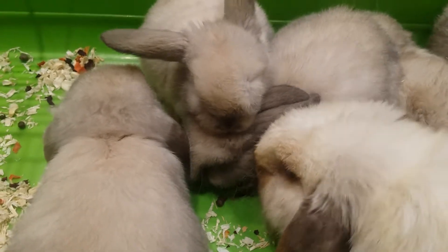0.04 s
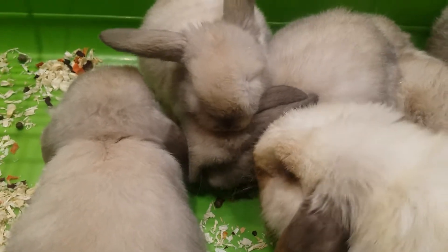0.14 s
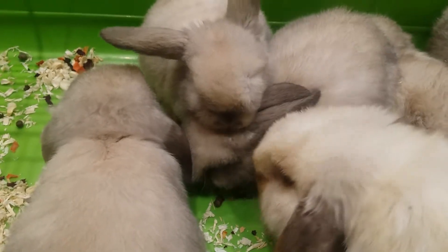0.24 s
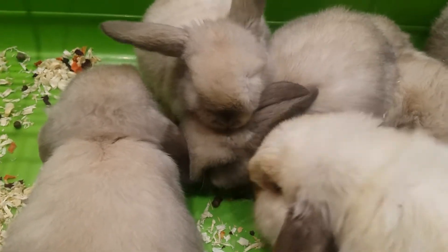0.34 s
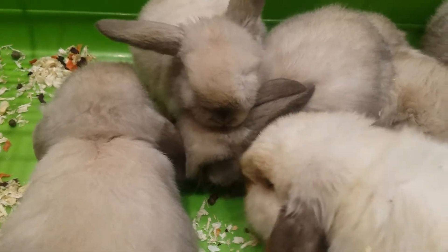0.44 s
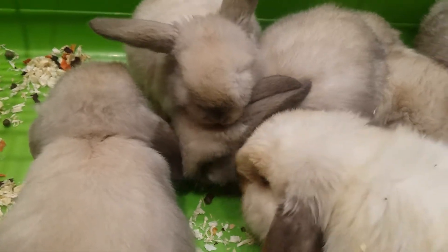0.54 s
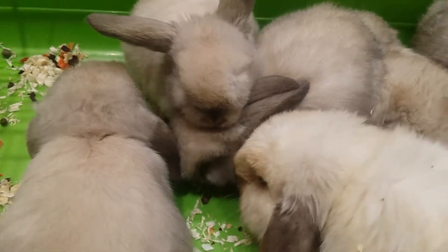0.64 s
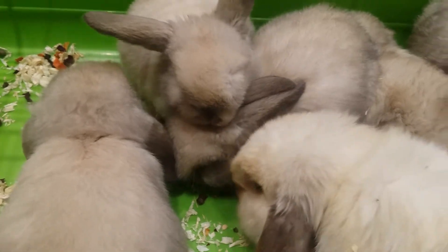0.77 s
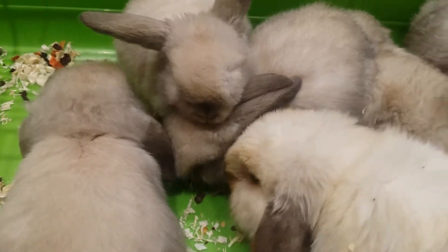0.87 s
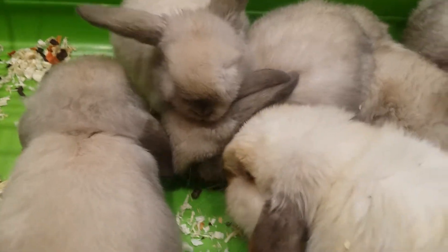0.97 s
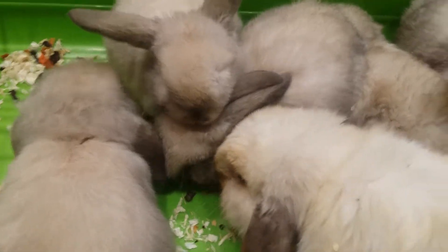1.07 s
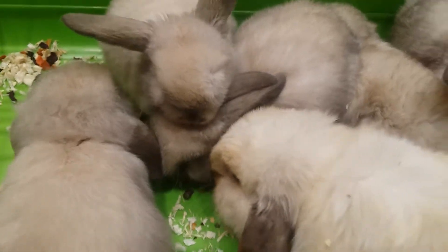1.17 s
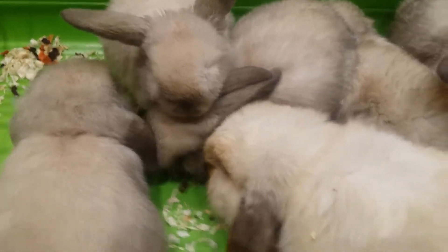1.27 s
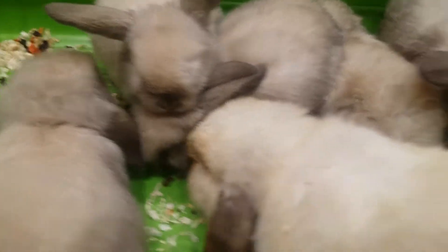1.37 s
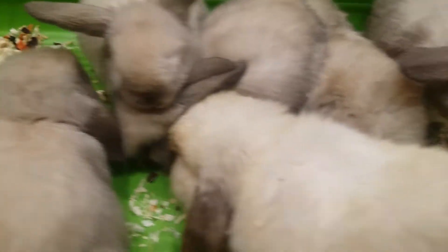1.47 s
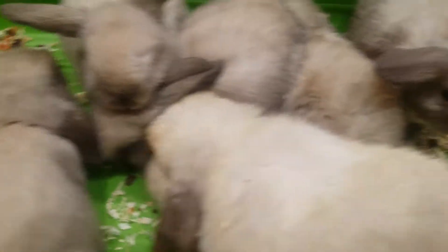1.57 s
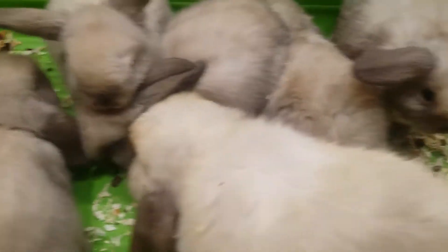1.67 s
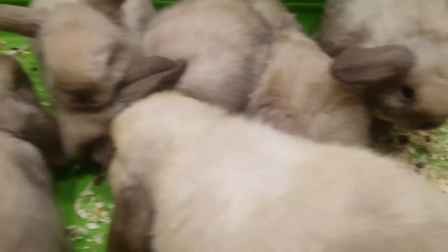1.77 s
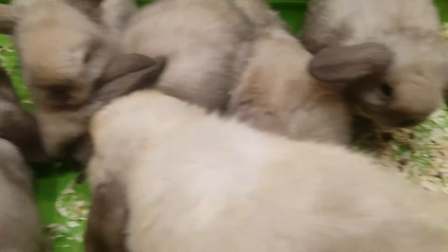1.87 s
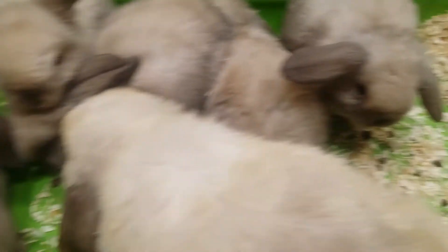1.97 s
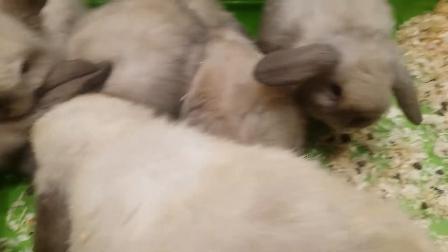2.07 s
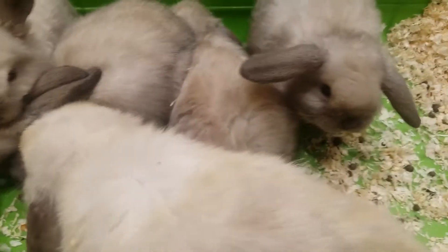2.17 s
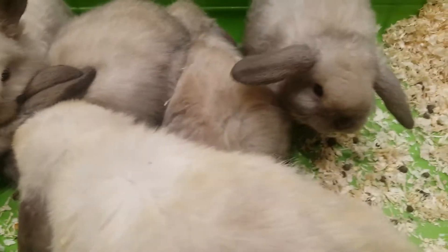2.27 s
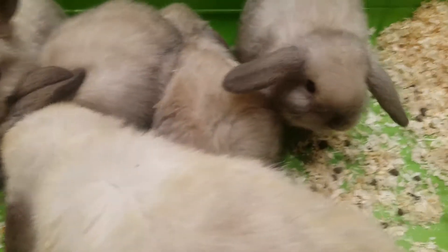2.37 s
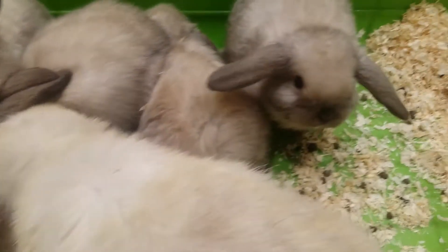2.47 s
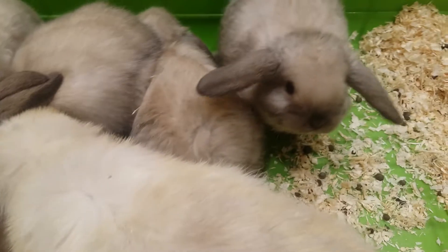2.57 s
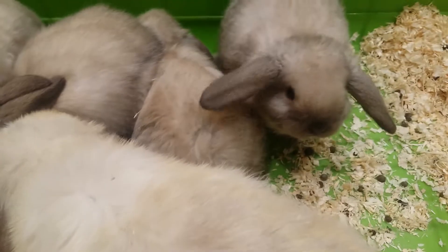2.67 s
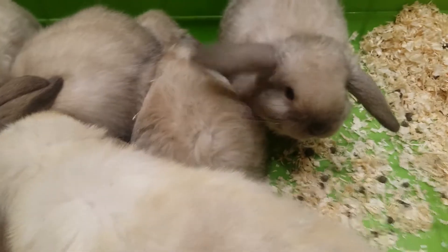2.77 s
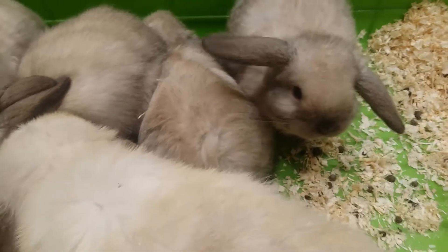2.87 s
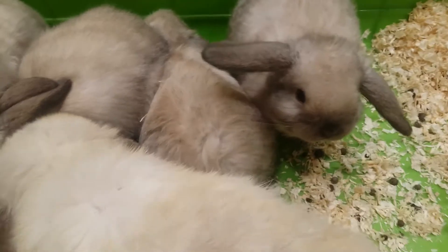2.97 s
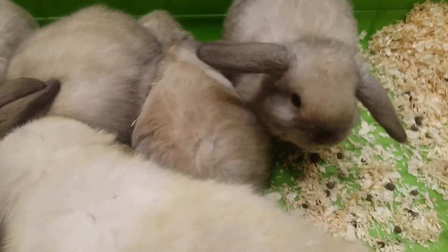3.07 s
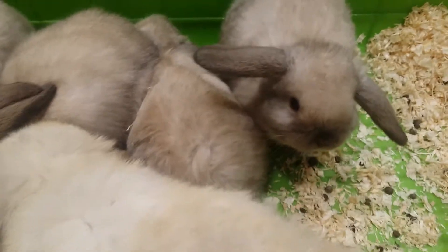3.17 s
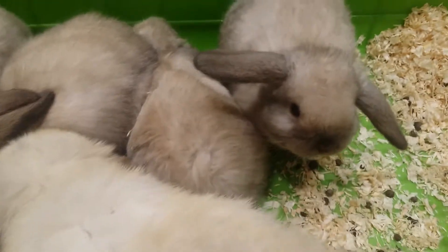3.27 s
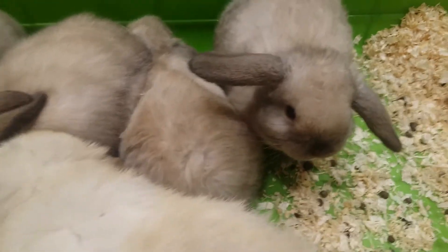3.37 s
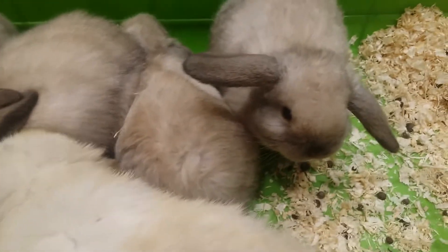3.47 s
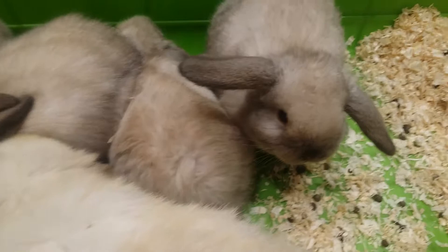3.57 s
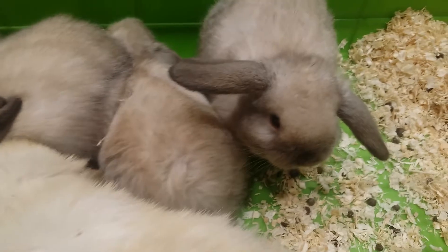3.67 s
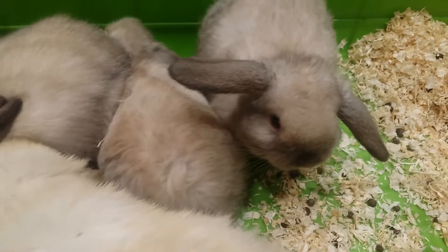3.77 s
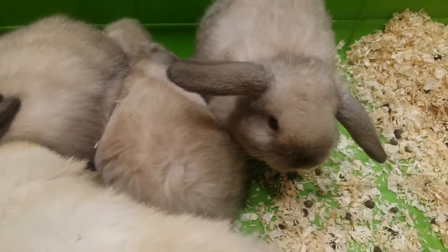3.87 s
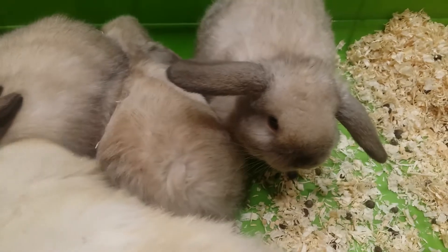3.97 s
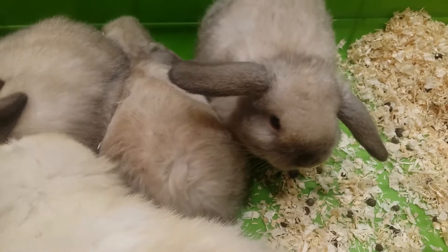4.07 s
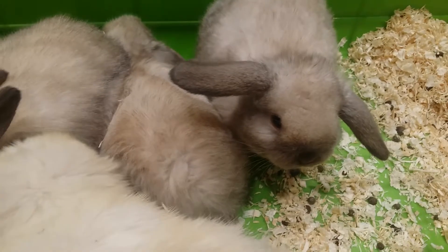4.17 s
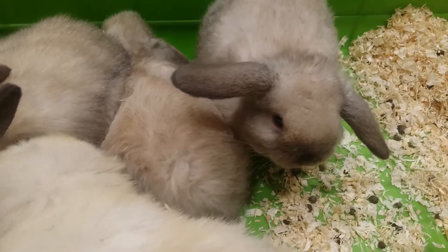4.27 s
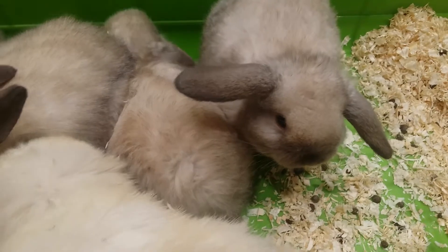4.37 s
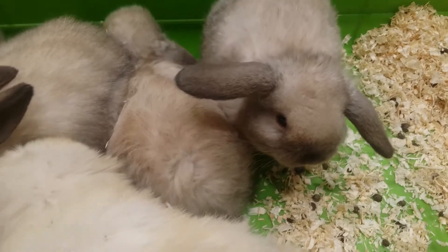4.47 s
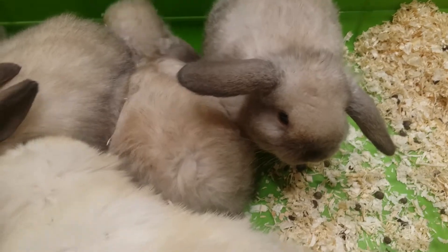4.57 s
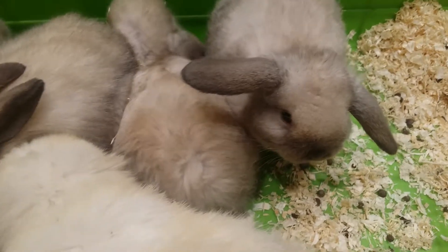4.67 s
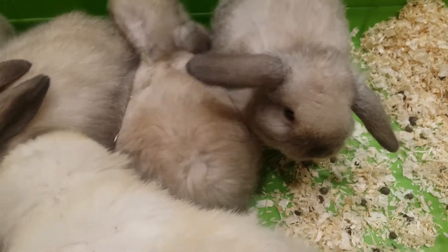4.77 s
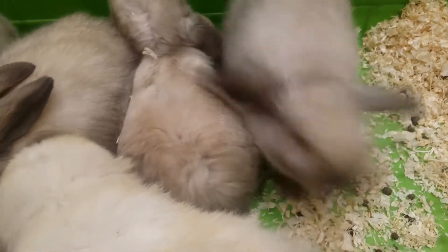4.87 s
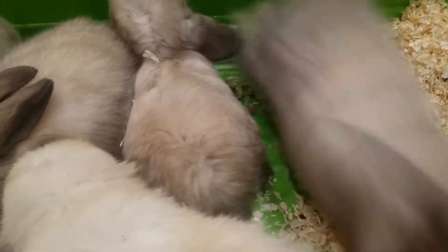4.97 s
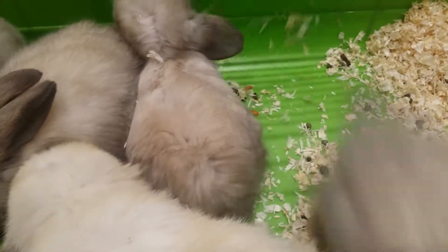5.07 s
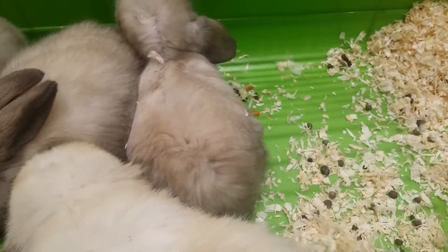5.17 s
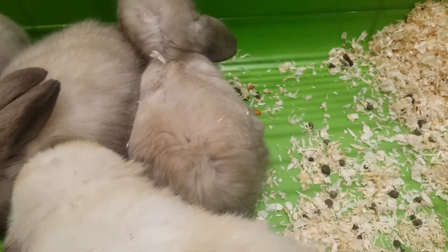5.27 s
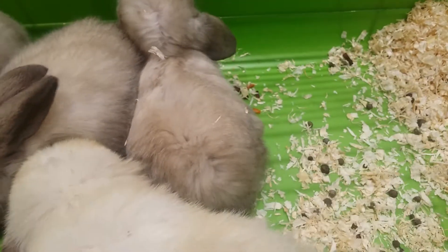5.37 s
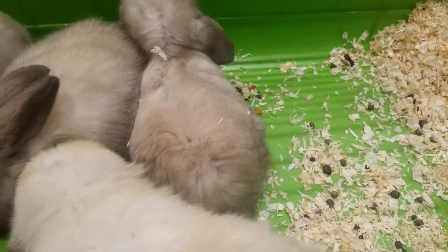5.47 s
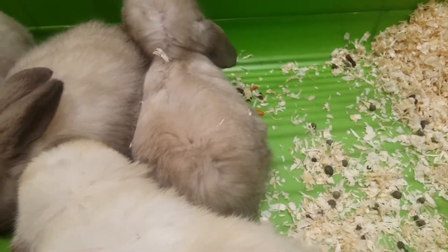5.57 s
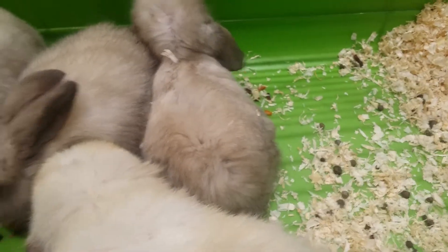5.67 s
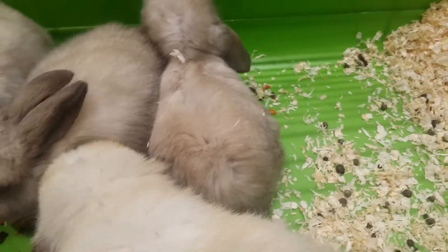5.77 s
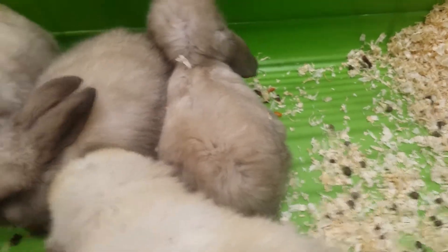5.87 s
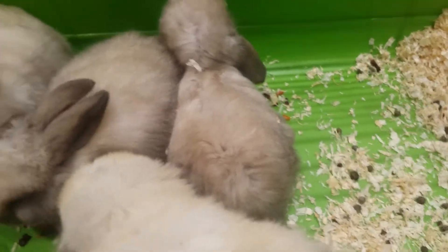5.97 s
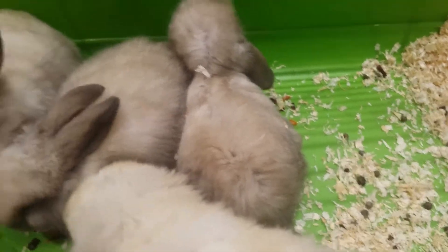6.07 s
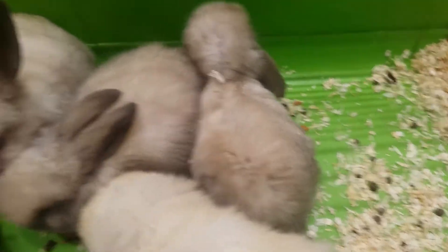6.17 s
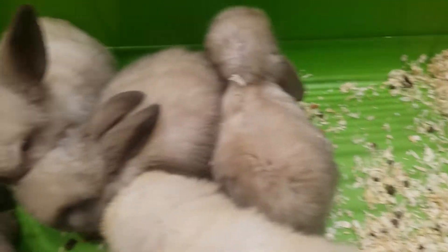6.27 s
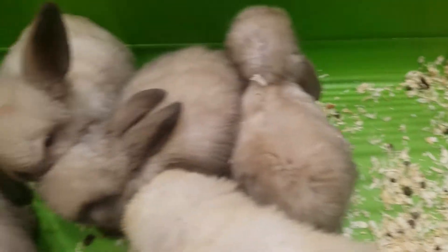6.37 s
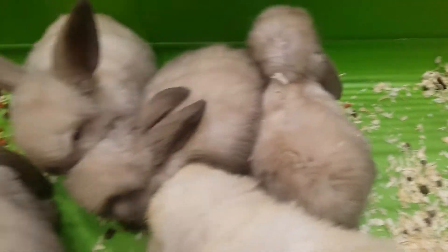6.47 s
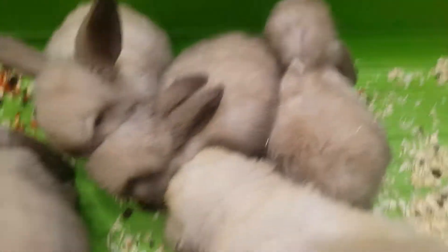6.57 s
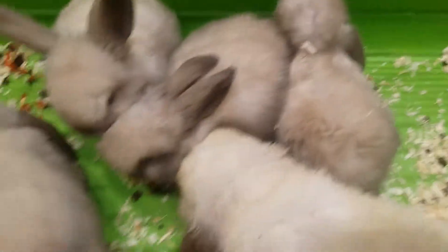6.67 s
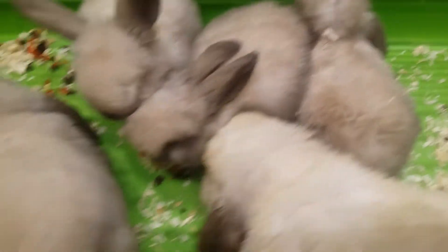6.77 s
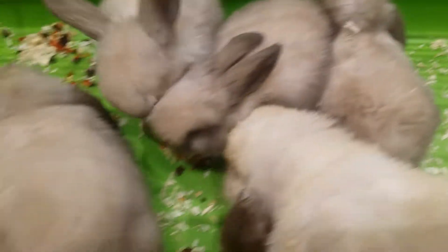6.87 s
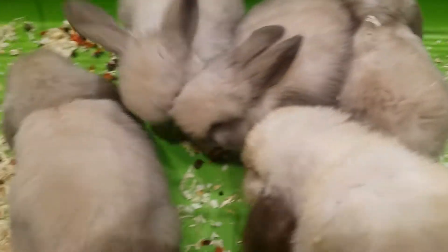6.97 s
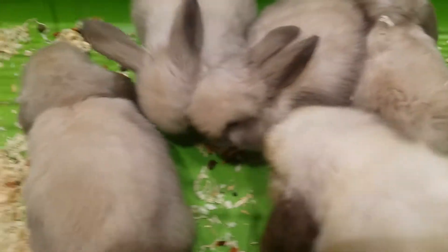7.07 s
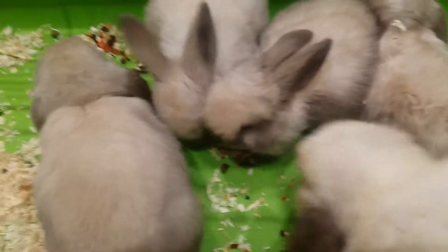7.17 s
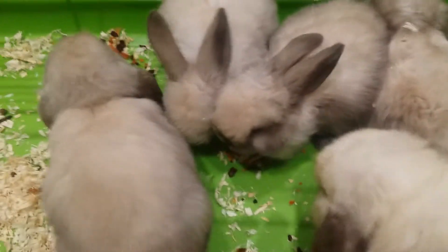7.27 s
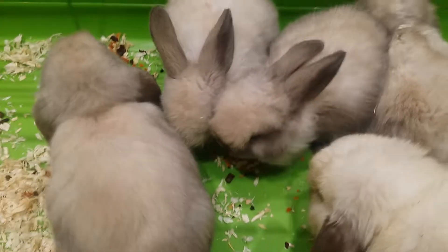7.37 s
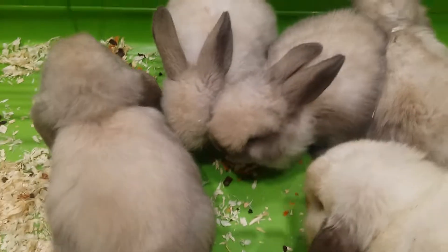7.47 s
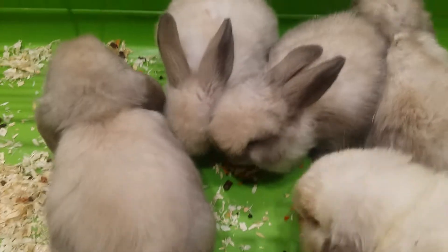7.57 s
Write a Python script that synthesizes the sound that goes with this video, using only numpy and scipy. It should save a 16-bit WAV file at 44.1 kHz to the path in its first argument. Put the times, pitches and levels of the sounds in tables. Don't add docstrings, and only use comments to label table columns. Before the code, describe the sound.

Indoors, very close over a plastic tray of wood shavings, young rabbits nibble dry pellets. From 0 to 1 second, bites come thick and uneven: small sharp cracks with short hollow knocks of the tray, like a tiny drum. Around 1.1 seconds a cluster of gritty crunches sits clearly to the left. Sparser bites follow, with isolated wire ticks from 1.25 seconds and a soft far thud near 1.9. Between about 2.7 and 3.7 seconds the cage wire creaks in a quick run of dry ticks. Claws tap around 4. At 4.9 to 5.5 one rabbit bolts: hard knocks, drumming feet, harsh gritty skidding and rustling shavings. Then it calms into quiet taps and light nibbling, with two wire ticks near 7.1 and a faint slow grind and scuff after 7.3. A low motor hum, room murmur and light hiss continue underneath.

```python
import sys
import numpy as np
from scipy import signal
from scipy.fft import rfft, irfft, next_fast_len
from scipy.io import wavfile
from scipy.ndimage import map_coordinates

SR = 44100
rng = np.random.default_rng(int(sys.argv[2]) if len(sys.argv) > 2 else 0)


def level_to_linear(level):
    exponent = np.asarray(level, float) / 20
    return 10 ** exponent


def pcm_store(signal):
    levels = np.round(np.clip(np.atleast_2d(signal), -1, 1) * 32767)
    wavfile.write(sys.argv[1], SR, levels.astype(np.int16).T)


N = 336555

# start in seconds, knock in dB, knock in Hz, crack in dB.
BITES = [(.0085, -33.5, 833, -56), (0.243, -53, 990, -63), (.252, -46, 1280, -57), (.282, -38, 1230, -52),
         (0.3105, -42, 1280, -52), (0.4567, -29, 1010, -43.5), (0.4877, -39, 850, -44.5),
         (0.4951, -30.5, 1230, -39.5), (.533, -45, 830, -53), (0.6692, -41, 990, -58),
         (.855, -34.5, 920, -49), (.862, -41, 950, -54), (1.1455, -54, 1150, -60), (1.2793, -43, 464, -60),
         (1.542, -50.5, 537, -47), (1.5815, -41.5, 1060, -46.5), (1.7071, -45.5, 1010, -45),
         (1.8453, -42, 1060, -50), (2.2896, -43.5, 1060, -53.5), (3.2225, -50.5, 570, -57),
         (4.129, -57, 980, -58), (4.875, -55.5, 530, -62), (5.0977, -53, 525, -42),
         (5.3495, -37, 1080, -55), (5.3685, -39, 1240, -46), (5.431, -43.5, 1020, -40),
         (5.7459, -51, 1100, -57), (6.3207, -46.5, 800, -52), (6.887, -48.5, 770, -49.5),
         (7.0071, -51, 1225, -54.5)]
# start in seconds, knock in dB, knock in Hz.
NUDGES = [(.0109, -45, 686), (.0428, -33, 794), (.3504, -45.5, 825), (.398, -55, 850), (.4274, -52, 860),
          (.51, -45, 1200), (.555, -42.5, 890), (.7872, -44, 1110), (.813, -48, 830), (.9314, -48, 1081),
          (.9785, -62, 666), (1.0365, -50.5, 830), (1.0644, -53, 1010), (1.0892, -52, 990),
          (1.1095, -53, 1150), (1.121, -53, 1140), (1.1325, -49, 1290), (1.5628, -53, 875),
          (1.614, -41, 1180), (1.8063, -44.5, 566), (1.833, -37.5, 971), (1.9277, -39.5, 466),
          (2.2395, -47, 940), (2.4945, -51, 631), (2.663, -50, 980), (2.678, -53, 585), (2.9469, -53, 509),
          (3.3448, -48.5, 850), (3.3518, -51, 540), (3.3902, -43, 876), (3.5059, -46.5, 710),
          (3.7867, -53, 980), (3.8188, -55, 893)]
# start in seconds, knock in dB, knock in Hz.
CLAW_STEPS = [(3.9166, -38, 972), (4.1857, -44, 1570), (4.2063, -34, 1020), (4.329, -53.5, 394),
              (4.652, -58, 800), (4.6774, -45, 853), (4.685, -48.5, 710), (4.9306, -26.5, 930),
              (4.9434, -29.5, 550), (5.424, -51, 845), (5.7302, -55, 481), (5.759, -55, 952),
              (5.899, -52.5, 773), (6.0271, -62, 480), (6.2799, -52.5, 1020), (6.4212, -47.5, 1270),
              (6.5478, -57.5, 655), (6.656, -53.5, 1014), (6.8133, -51, 520), (6.8394, -55, 700),
              (6.979, -57.5, 1000), (7.0141, -48, 947), (7.098, -51, 750), (7.2477, -50, 650),
              (7.2532, -48, 721), (7.3077, -48.5, 790), (7.325, -57, 627), (7.5073, -55, 460),
              (7.5165, -46, 656)]
# start in seconds, crack in dB, left over right in dB,
# extra fizz in dB.
SNAPS = [(0.0108, -34.5, 23.5, -5), (.2815, -54, -2, 16), (.35, -60, -3, 14), (.9597, -62, 9, 0),
         (1.0307, -56.5, 2, 0), (1.1157, -52, 18, -4), (1.1245, -50, 19, -3), (1.1332, -48, 20, -3),
         (1.139, -54, 18, 11), (1.1462, -48, 16, -8), (1.1544, -36, 17.5, 5.5), (1.1793, -54, 13, -3),
         (3.1778, -62, 0, 0), (4.0887, -65, 20, 8), (4.948, -54, -11, 0), (5.184, -39, -2.5, 8),
         (5.424, -48, 3, 0), (5.74, -59, -8, 0), (5.835, -64, 3, 0), (6.0241, -70, -6, 0),
         (6.164, -56, 2, 2), (7.3373, -57.5, 5, 0), (7.4286, -53.5, 9, 7), (7.4762, -42, -1, 8)]
# centre in Hz, width in Hz, level in dB.
CRACK_MODES = [(2360, 1100, 1), (3910, 800, 4.5), (5340, 1030, 7), (14200, 6000, -13)]
# centre in Hz, width in Hz, level in dB.
TRAY_MODES = [(520, 260, -1.5), (800, 1100, -13), (1240, 56, 2), (2120, 83, -14), (324, 260, -18)]
# time in seconds, left lag of the eaters in ms.
PHONE_SWING = [(0, -.09), (1.2, -.07), (1.8, -.12), (2.3, -.29), (3.6, -.3), (3.9, -.16), (4.7, -.24),
               (4.9, .03), (5.36, .08), (5.42, -.3), (6.9, -.3), (7, .05), (7.63, 0)]
SOFT_CRACK_DB, CRACK_GROWS = -61.5, 0.46
PELLET_EDGE_DB, CLAW_EDGE_DB = -17.5, -15
MUFFLED_DB = -9
SNAP_KNOCK_DB, SNAP_HZ, SNAP_LAG_MS = -64.5, 790, 0.11
SNAP_THIN_DB = -10

# peak in seconds, rise in seconds, t60 in seconds, level in dB,
# left over right in dB.
CHEWS = [
    (1.088, 0.0067, 0.049, -64, 14),
    (1.108, .006, 0.22, -60, 22),
    (1.124, 0.0066, 0.21, -52, 20.5),
    (1.138, 0.0081, .04, -55, 20),
    (1.171, 0.0044, 0.071, -57, 18),
    (1.18, 0.0053, 0.043, -53, 15),
    (1.186, .004, .02, -55, 19),
    (7.432, .0033, 0.43, -61.5, 11.5),
    (7.611, 0.056, .53, -62.5, 8),
]
# centre in Hz, width in Hz, level in dB.
MOUTH_MODES = [(3440, 970, -2.5), (4970, 1100, -0.5), (1330, 1930, -8), (2460, 690, -3)]

# peak in seconds, t60 in seconds, rustle in dB,
# tray scrape in dB, scrape in Hz.
SHUFFLES = [(.13, 0.75, -63, -79, 800), (.871, 0.44, -63, -79, 880), (4.039, 0.18, -64, -69, 920),
            (4.09, 0.21, -64, -71, 1136), (5.006, 0.13, -40.5, -34, 568), (5.205, 0.16, -44, -52, 520),
            (5.263, 0.37, -41.5, -42, 552), (5.3, 0.15, -50.5, -49.5, 1820),
            (5.755, 0.079, -61, -59.5, 1020), (6.075, 0.19, -62, -62, 622.3), (6.16, 0.72, -66, -77, 800),
            (7.255, 0.33, -93, -59, 523), (7.32, .3, -84, -65, 590), (7.41, 0.37, -88, -67.5, 570),
            (7.5, 0.64, -62.5, -63.5, 523)]
# peak in seconds, t60 in seconds, rustle in dB, tray
# scrape in dB, scrape in Hz.
KICKS = [(3.93, 0.43, -80, -65.5, 800), (4.225, 0.3, -79, -62.5, 1000), (4.898, .2, -60.5, -71, 905),
         (4.919, 0.17, -49, -49, 800), (4.945, 0.13, -49, -38.5, 625), (5.017, 0.055, -47, -26.5, 1240),
         (5.05, 0.55, -49, -45.5, 1250), (5.235, 0.45, -47, -51, 800), (5.075, 0.21, -57, -40.5, 520),
         (5.095, 0.049, -48, -48, 520), (5.147, 0.14, -45, -42.5, 490), (5.185, 0.15, -59, -52, 550),
         (5.35, 0.2, -43, -46.5, 1014), (5.37, 0.13, -43.5, -55, 1140), (5.43, 0.22, -55.5, -58, 994),
         (5.475, 0.2, -58.5, -62.5, 800)]
# frequency in Hz, density in dB per Hz.
SHAVINGS = [(880, -3.5), (1500, -3), (2260, -5.5), (5730, -3), (7510, -13.5), (14500, -15), (15600, -13),
            (16400, -54.5)]
SHUFFLE_RISE, KICK_RISE_S = 0.12, 0.0063
LEAD_S = 0.12

# start in seconds, level in dB, tray mode in Hz, t60
# in seconds.
PADS = [(3.9165, -45, 700, 0.026), (4.2054, -46, 704, 0.031), (4.894, -57, 1012, .02),
        (4.916, -37, 1090, 0.045), (4.993, -33, 563, .03), (5.005, -29, 613, 0.036),
        (5.0735, -33.5, 507, .03), (5.092, -32, 520, 0.023), (5.0965, -32, 520, .02),
        (5.149, -32.5, 492, 0.034), (5.182, -37, 550, 0.028), (5.219, -35, 520, 0.027),
        (5.236, -37, 800, .03), (5.25, -37, 520, .03), (5.26, -34, 530, 0.029), (5.268, -33.5, 1190, 0.023),
        (5.297, -34.5, 900, .03), (5.347, -40, 500, 0.018)]
# peak in seconds, rise in seconds, t60 in seconds, level in dB,
# left over right in dB.
SKIDS = [
    (4.945, .012, 0.094, -47.5, -8),
    (5.003, 0.0096, 0.13, -35, -6),
    (5.016, 0.0071, 0.061, -25, -3.5),
    (5.023, .004, .022, -28, -6),
    (5.04, 0.0095, 0.75, -41.5, -5),
]
# centre in Hz, width in Hz, level in dB.
HEEL_MODES = [(3150, 1130, -2.5), (4660, 1420, -1.5), (7500, 3700, -20), (1250, 250, 0)]

# start in seconds, level in dB, 2.5 kHz mode in dB, fizz in dB.
WIRE_SLIPS = [(1.2531, -41.5, -7, -31), (1.3192, -39.5, -11, -29), (1.3686, -48.5, -9, -22),
              (1.6655, -29.5, -15, -10), (2.1377, -27.5, -13.5, -13), (2.725, -55, -24, -15),
              (2.7792, -34, -12, -23), (2.831, -39, -19, -14), (2.8593, -36, -24.5, -10.5),
              (2.8923, -37, -23, -4.5), (2.9196, -42.5, -21, -9), (2.9442, -56, -10, -19),
              (2.9524, -58, -10, -17), (2.9594, -59, -8, -17), (2.9664, -56, -11, -20),
              (2.9858, -54, -11, -20), (2.995, -51, -12, -20), (3.0021, -47, -11, -12),
              (3.0126, -42.5, -17, -12), (3.0262, -44, -10, -19), (3.036, -39.5, -19, -20),
              (3.048, -39.5, -12, -25), (3.0611, -42.5, -12, -22), (3.0714, -44, -5, -22),
              (3.1183, -41.5, -7, -23), (3.1467, -36, -11, -28), (3.1679, -34, -15, -32),
              (3.237, -39.5, -7, -26), (3.2912, -37, -8, -33), (3.3263, -38, -6, -28),
              (3.4004, -43, -12, -24), (3.4498, -39.5, -9, -29), (3.5142, -37, -13, -24),
              (3.5498, -38.5, -10, -19), (3.6142, -46.5, 8, -30), (3.6581, -48.5, -6, -27),
              (3.7293, -44, -9, -27), (7.0589, -50, -8, -20), (7.1178, -44, -13, -11)]
# centre in Hz, width in Hz, level in dB.
WIRE_MODES = [(2480, 760, 0), (4920, 730, 6.5), (3900, 130, 7), (1060, 170, 5)]
# centre in Hz, width in Hz, level in dB.
WIRE_FIZZ = [(8850, 1200, -13), (11900, 670, 1), (15500, 3200, 2)]

# start in seconds, level in dB, t60 in seconds, lowest mode in Hz.
THUDS = [(.68, -56.5, 0.44, 148), (1.409, -59.5, 0.87, 150), (1.924, -46.5, 1.18, 137),
         (2.17, -57.5, 0.67, 147.7), (4.96, -58, 0.51, 89), (5.088, -40.5, 0.12, 143),
         (5.145, -41.5, 0.27, 129), (5.243, -45, 0.39, 100.5), (5.343, -42, 0.29, 125),
         (5.72, -55, 0.24, 143), (6.186, -52.5, 0.15, 175)]
# frequency in Hz, likeness from 0 to 1.
THUD_ALIKE = [(100, 1), (1000, 0.45)]
THUD_RISE_S = 0.0053

# time in seconds, hum in Hz, level in dB.
MOTOR = [(0, 84.5, -66.5), (.66, 83.7, -65.5), (.8, 80.4, -69), (1, 82.94, -65.5), (1.85, 83, -61.5),
         (2.04, 82.15, -55), (2.36, 82.9, -60.5), (2.8, 83.04, -60.5), (3.3, 82.7, -61), (4.3, 81.4, -69.5),
         (4.42, 82.9, -74.5), (5.6, 81, -73), (6.6, 81.2, -70.5), (7.63, 79.9, -60.5)]
# frequency in Hz, level in dB.
WHINE = [(140, -80), (237, -92), (296, -87), (883, -84.5)]
# time in seconds, level in dB.
AIR = [(0, -74.5), (.66, -69.5), (1.1, -71), (1.89, -69.5), (2.3, -69.5), (2.6, -73.5), (2.85, -70),
       (3.3, -70.5), (3.8, -75), (4.3, -73.5), (4.4, -79), (4.9, -77.5), (5.55, -74), (5.95, -73.5),
       (6.6, -75.5), (7.1, -72.5), (7.63, -72)]
# frequency in Hz, density in dB per Hz.
MURMUR = [(15, -30), (30, -31.5), (87, -2), (135, -13.5), (398, -13), (814, -20), (2200, -30.5),
          (4400, -120)]
# frequency in Hz, density in dB per Hz.
HISS = [(710, -0.5), (2000, -5), (4600, -3.5), (5900, -2.5), (6600, -9.5), (8500, -12.5), (14500, -9),
        (16500, -9)]
MURMUR_DB, MURMUR_GROWS = 5, 1.28

# frequency in Hz, likeness from 0 to 1.
ALIKE = [(60, 0.82), (130, 0.72), (290, 0.68), (640, 0.44), (1400, 0)]
# frequency in Hz, left over right in dB.
PORTS = [(60, 0), (180, -2), (550, -1.5), (1650, -1.5), (4970, 5.5), (15000, -2)]
TOP_HZ = 15600


def unit(x):
    return x / np.sqrt(np.mean(x ** 2) + 1e-20)


def along(points, hz):
    f, v = np.transpose(points)
    return np.interp(np.log(hz + 1), np.log(f + 1), v)


def curves(rows):
    s, *cols = np.transpose(rows)
    return [np.interp(np.arange(N) / SR, s, c) for c in cols]


def wobble(rate):
    knots = rng.standard_normal(int(N * rate / SR) + 4)
    return map_coordinates(knots, [np.arange(N) * rate / SR])


def filtered(x, response):
    n = x.shape[-1]
    m = next_fast_len(n + 2048)
    return irfft(rfft(x, m) * response(np.fft.rfftfreq(m, 1 / SR)), m)[..., :n]


def modes(table):
    def response(f):
        return sum((-1) ** k * level_to_linear(db) * 1j * f * width / (centre * centre - f * f + 1j * f * width)
                   for k, (centre, width, db) in enumerate(table))
    return response


def pair(x, response, alike=ALIKE):
    def mid_side(hz):
        turn = np.arccos(np.clip(along(alike, hz), -1, 1)) / 2
        return response(hz) * [np.cos(turn), np.sin(turn)]
    mid, side = filtered(x, mid_side)
    return unit(np.array([mid + side, mid - side]))


def place(s, shapes, db, lag_ms, pan_db=0):
    shapes = shapes / np.abs(shapes).max(1, keepdims=True)
    steps = np.arange(shapes.shape[1])

    def ear(side):
        first = np.round((s + side * lag_ms / 2000) * SR).astype(int)
        scaled = shapes * level_to_linear(db + side * pan_db / 2)[:, None]
        return np.bincount((first[:, None] + steps).ravel(), scaled.ravel(), N + SR)[:N]
    return np.array([ear(0.92), ear(-1)])


def grit(n, share, spread_db, shared):
    hit = rng.random((3, n)) < share
    size = level_to_linear(spread_db * np.minimum(rng.exponential(size=(3, n)), np.pi))
    common, *own = rng.standard_normal((3, n)) * (hit * size + 0.2)
    return shared * common + (1 - shared) * np.array(own)


def add(out, s, rise, t60, sound):
    since = np.arange(sound.shape[1]) / SR - LEAD_S
    swell = np.exp(np.minimum(since, 0) / rise)
    decay = level_to_linear(-60 * np.maximum(since, 0) / t60)
    out[:, round((s - LEAD_S) * SR):][:, :len(since)] += np.where(since < 0, swell, decay) * sound


def crumbs(rows, colour, share, spread_db, shared):
    out = np.zeros((2, N + SR))
    for s, rise, t60, db, pan_db in rows:
        burst = filtered(grit(SR // 2, share, spread_db, shared), modes(colour))
        add(out, s, rise, t60, level_to_linear(db + pan_db * np.array([[.5], [-.5]])) * unit(burst))
    return out[:, :N]


def contacts():
    def soft(rows, edge_db):
        return [(s, db, hz, SOFT_CRACK_DB + CRACK_GROWS * (db + 44), edge_db) for s, db, hz in rows]
    near = [(*row, PELLET_EDGE_DB) for row in BITES]
    near += soft(NUDGES, PELLET_EDGE_DB) + soft(CLAW_STEPS, CLAW_EDGE_DB)
    near = [(*row, np.interp(row[0], *np.transpose(PHONE_SWING)), 0, 1.5, MUFFLED_DB) for row in near]
    in_air = [(s, SNAP_KNOCK_DB, SNAP_HZ, db, PELLET_EDGE_DB, SNAP_LAG_MS, pan_db, SNAP_THIN_DB, fizz_db)
              for s, db, pan_db, fizz_db in SNAPS]
    return near + in_air


def bites():
    s, knock_db, hz, crack_db, edge_db, lag_ms, pan_db, body_db, fizz_db = np.transpose(contacts())
    t, hz = np.arange(1024) / SR, hz[:, None]
    chance = rng.standard_normal((len(s), 3 * len(t) + 3))
    after_chance, phase, edge_chance = chance[:, :1], chance[:, 1:2], chance[:, 2:3]
    swell = 1 - np.exp(-t / 0.0003)
    blow = level_to_linear(-60 * t / 0.0039) * np.sin(2 * np.pi * 1.08 * hz * t)
    upper = np.sin(2 * np.pi * 2.14 * hz * t) - .8 * np.sin(2 * np.pi * 2.81 * hz * t)
    edge = level_to_linear(edge_db[:, None] + 2 * edge_chance - 60 * t / 0.0047) * upper
    after = level_to_linear(-19.5 + 2 * after_chance - 60 * t / 0.027) * np.sin(2 * np.pi * 0.801 * hz * t + phase)
    scatter = unit(filtered(chance[:, 3:len(t) + 3], modes(TRAY_MODES))) * level_to_linear(-20 - 60 * t / .025)
    knock = filtered(swell * (after + scatter - blow - edge), lambda f: (1j * f / (260 + 1j * f)) ** 2)

    noise = np.array(np.split(chance[:, len(t) + 3:], 2, 1))
    splinters = (t == 0) + noise * (level_to_linear(-7 - 60 * t / .004) + level_to_linear(-34 - 60 * t / .02))
    bright = level_to_linear(0.32 * (crack_db[:, None] + 43) + fizz_db[:, None])
    body = level_to_linear(body_db[:, None]) * filtered(splinters, modes(CRACK_MODES[:1]))
    middle = filtered(splinters, modes(CRACK_MODES[1:3]))
    fizz = bright * filtered(splinters, modes(CRACK_MODES[3:]))
    crack = body - middle - fizz
    cracks = [place(s - .0005, crack[ear], crack_db + 8.0, lag_ms, pan_db)[ear] for ear in range(2)]
    return place(s - .0008, knock, knock_db + 2.5, lag_ms) + cracks


def chewing():
    return crumbs(CHEWS, MOUTH_MODES, share=.02, spread_db=-0.5, shared=0.31) * level_to_linear(1.9 * wobble(160))


def paws():
    out = np.zeros((2, N + SR))
    strokes = [(SHUFFLE_RISE * row[1], *row) for row in SHUFFLES] + [(KICK_RISE_S, *row) for row in KICKS]
    for rise, s, t60, rustle_db, scrape_db, hz in strokes:
        crackle = grit(SR // 2, share=.035, spread_db=1.0, shared=0.14)
        crackle = filtered(crackle, lambda f: level_to_linear(along(SHAVINGS, f)))
        drag = grit(SR // 2, share=.007, spread_db=0.5, shared=0.56)
        drag = filtered(drag, modes([(hz, 0.16 * hz, 0), (2.19 * hz, 0.66 * hz, -13)]))
        add(out, s, rise, t60, level_to_linear(rustle_db) * unit(crackle) + level_to_linear(scrape_db) * unit(drag))
    return out[:, :N] * level_to_linear([[-1.2], [1.2]]) * level_to_linear(2.4 * wobble(90) + 1.8 * wobble(30))


def dash():
    s, db, hz, t60 = np.transpose(PADS)[:, :, None]
    t = np.arange(2048) / SR
    rattle = unit(filtered(rng.standard_normal((len(PADS), len(t))), modes(TRAY_MODES)))
    upper = level_to_linear(-9.5 - 60 * t / t60) * np.sin(2 * np.pi * 2.2 * hz * t)
    ring = np.sin(2 * np.pi * hz * t) + upper + level_to_linear(-11) * rattle
    ring = ring * level_to_linear(-60 * t / t60) * (1 - np.exp(-t / 0.00042))
    lag_ms = np.interp(s[:, 0], *np.transpose(PHONE_SWING))
    pads = place(s[:, 0], ring, db[:, 0], lag_ms, -2.2)
    return pads + crumbs(SKIDS, HEEL_MODES, share=.05, spread_db=0.0, shared=0.38)


def wire():
    s, db, low_db, fizz_db = np.transpose(WIRE_SLIPS)
    t = np.arange(512) / SR
    rasp = rng.standard_normal((len(s), len(t)))
    slip = (t == 0) + rasp * (level_to_linear(-19 - 60 * t / .002) + level_to_linear(-34 - 60 * t / .012))

    def ringing(table):
        x = filtered(slip, modes(table))
        return x / np.abs(x).max(1, keepdims=True)
    low, high, fizz = ringing(WIRE_MODES[:1]), ringing(WIRE_MODES[1:]), ringing(WIRE_FIZZ)
    tick = level_to_linear(low_db[:, None] + 16.0) * low + high + level_to_linear(fizz_db[:, None] + 8) * fizz
    return place(s + 0.00107, tick, db + 3.5, 0.403) * level_to_linear([[2.5], [-4.5]])


def thuds():
    out, t = np.zeros((2, N + SR)), np.arange(SR) / SR
    for s, db, t60, hz in THUDS:
        low_modes = modes([(hz, .5 * hz, 0), (2.526 * hz, 0.43 * hz, -4)])
        high_mode = modes([(3.8 * hz, 3 * hz, 0)])
        low = pair(rng.standard_normal((2, SR)), low_modes, THUD_ALIKE)
        high = pair(rng.standard_normal((2, SR)), lambda f: high_mode(f) ** 2, THUD_ALIKE)
        boom = level_to_linear(-60 * t / t60) * low + level_to_linear(-7.0 - 70 * t / t60) * high
        out[:, round(s * SR):][:, :SR] += level_to_linear(db) * (1 - np.exp(-t / THUD_RISE_S)) * boom
    return out[:, :N]


def house():
    (hum_hz, hum_db), (hiss_db,) = curves(MOTOR), curves(AIR)
    murmur_db = hiss_db.mean() + MURMUR_DB + MURMUR_GROWS * (hiss_db - hiss_db.mean())
    hum_level = np.sqrt(2) * level_to_linear(hum_db + 0.29 * wobble(5.7))
    hum = hum_level * np.sin(2 * np.pi * np.cumsum(hum_hz + 0.18 * wobble(16)) / SR)
    lines = sum(level_to_linear(db - 2.0 + 1.0 * wobble(25)) * np.sin(2 * np.pi * hz * np.arange(N) / SR)
                for hz, db in WHINE)
    rumble = grit(N, share=0.013, spread_db=4.0, shared=0) * level_to_linear(2.24 * wobble(30))
    murmur = pair(rumble, lambda hz: level_to_linear(along(MURMUR, hz)))
    hiss = pair(rng.standard_normal((2, N)), lambda hz: level_to_linear(along(HISS, hz)))
    return hum + lines + level_to_linear(murmur_db) * murmur + level_to_linear(hiss_db + 5.0 + 0.81 * wobble(8)) * hiss


def scene():
    return bites() + chewing() + paws() + dash() + wire() + thuds() + house()


def top_cut(x):
    return signal.sosfilt(signal.butter(12, 17000, fs=SR, output="sos"), x)


def record(dry):
    def ports(hz):
        top_db = -np.clip((hz - TOP_HZ) / 8, 0, 22) - np.clip((hz - TOP_HZ - 700) / 8, 0, 90)
        return level_to_linear(np.outer([.5, -.5], along(PORTS, hz)) + top_db)
    mix = filtered(dry, ports)
    return top_cut(mix)


dry = scene()
out = record(dry)
pcm_store(out)
```